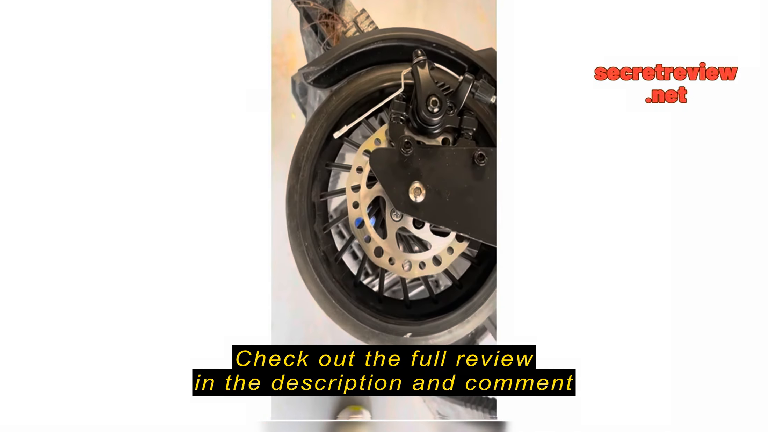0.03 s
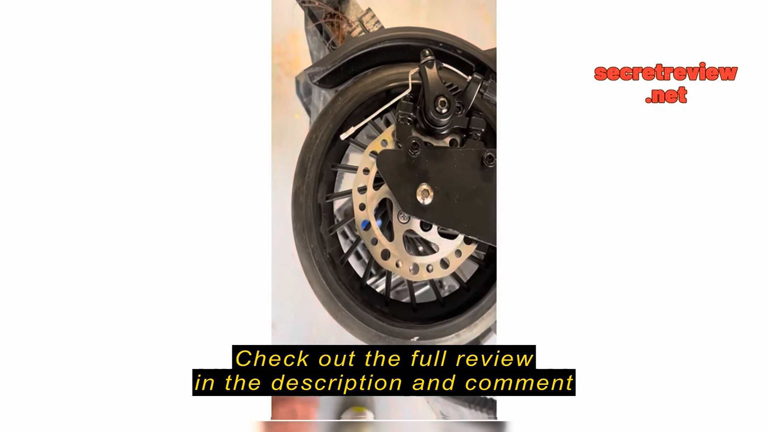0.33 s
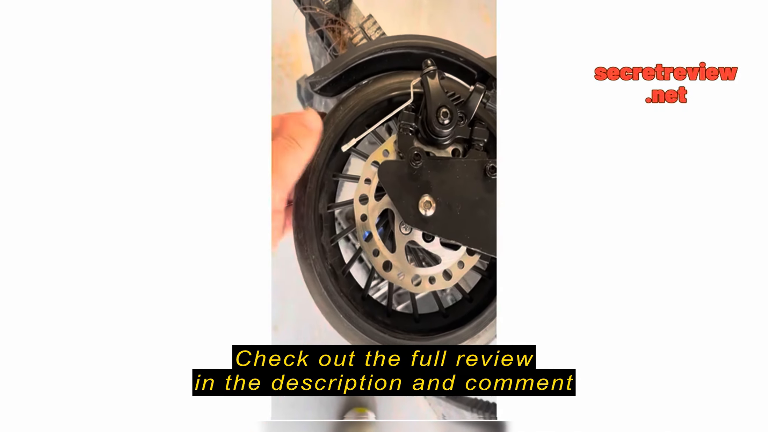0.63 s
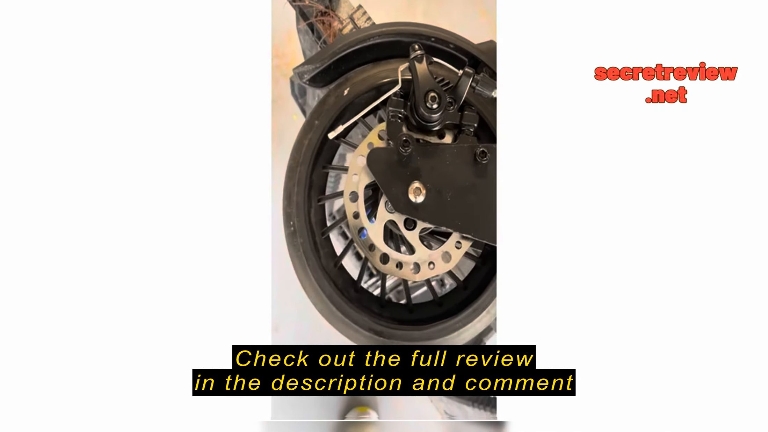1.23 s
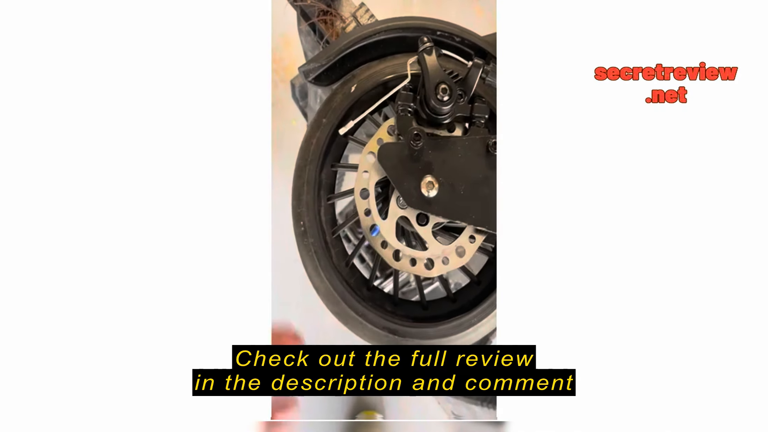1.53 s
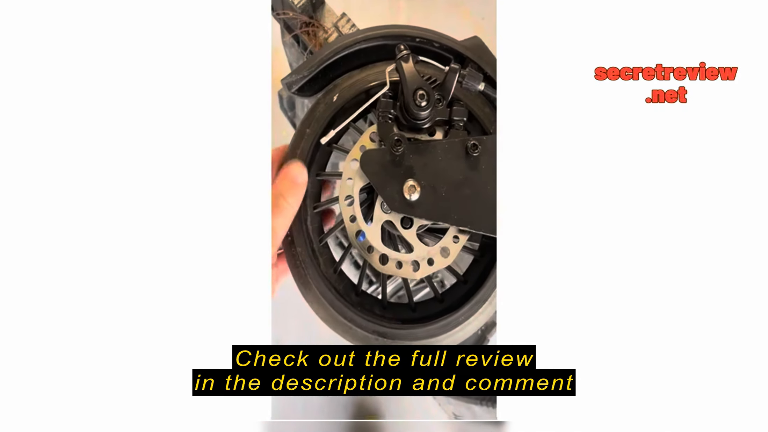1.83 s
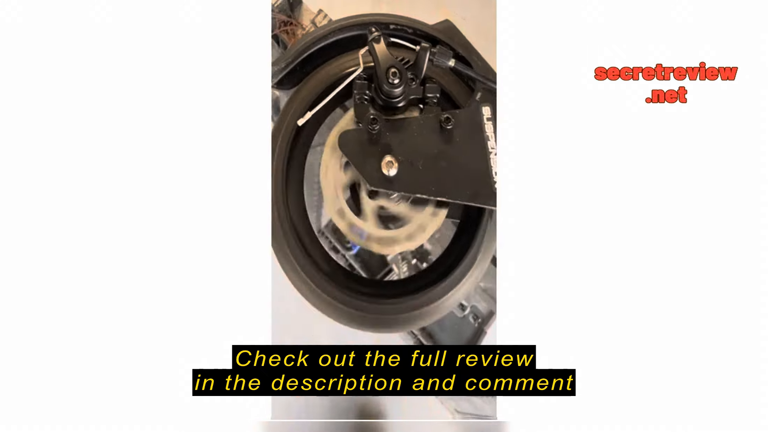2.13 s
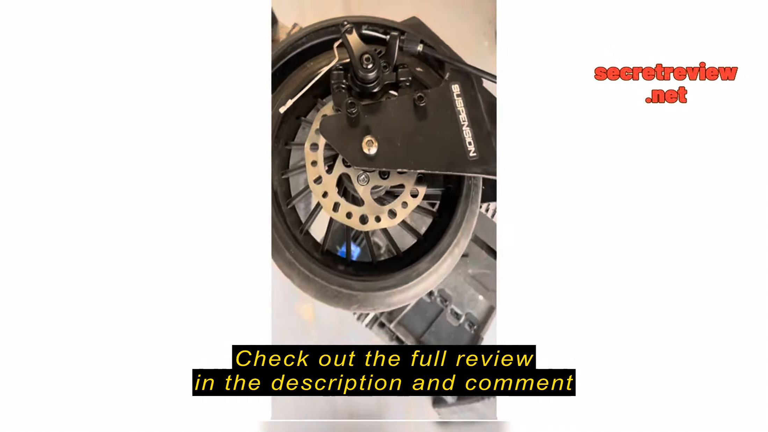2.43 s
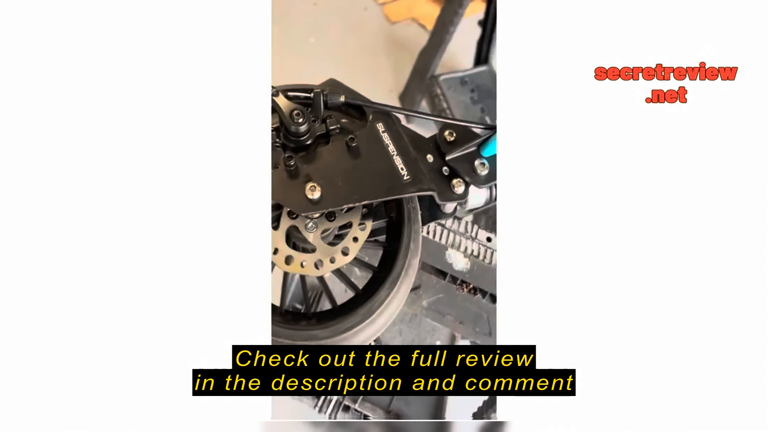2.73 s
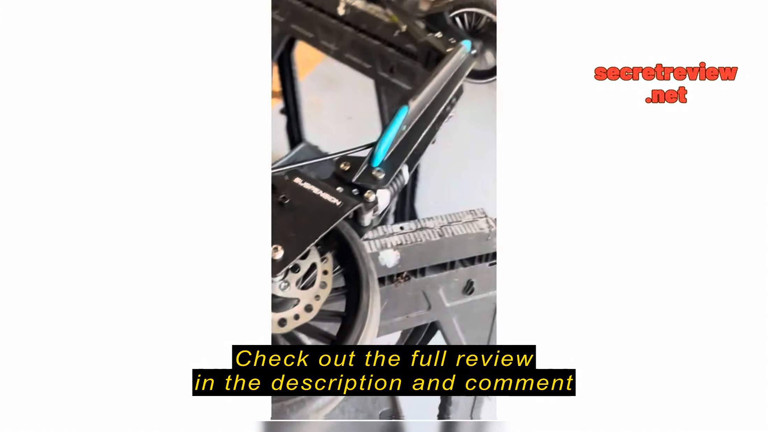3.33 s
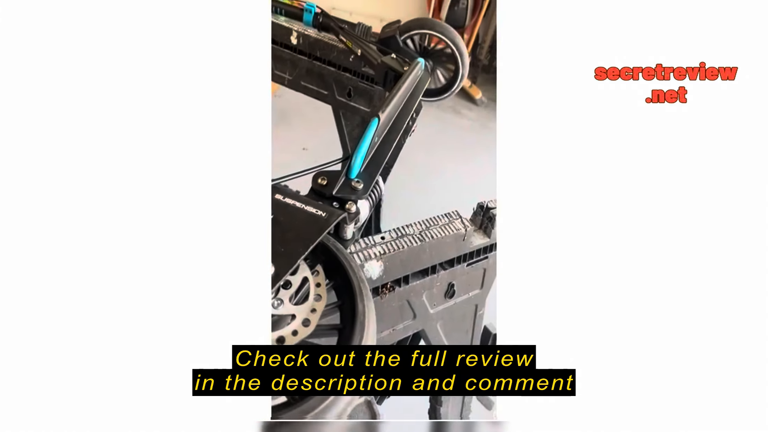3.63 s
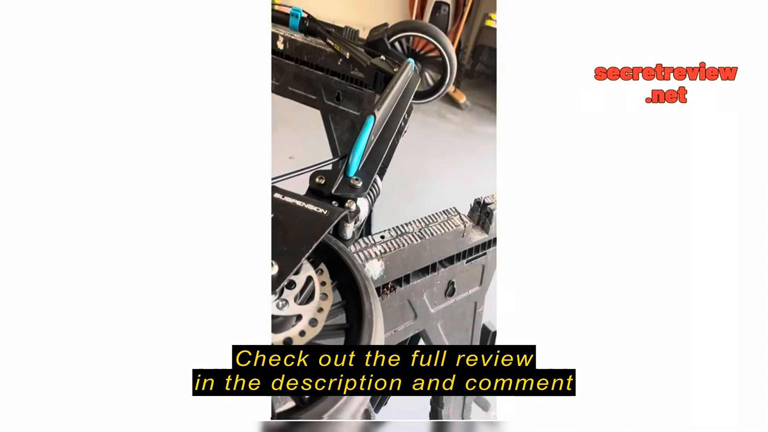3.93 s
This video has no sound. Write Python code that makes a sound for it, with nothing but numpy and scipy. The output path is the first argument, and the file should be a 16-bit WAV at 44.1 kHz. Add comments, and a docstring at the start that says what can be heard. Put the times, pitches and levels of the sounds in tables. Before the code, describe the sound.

Metallic ticking and rubbing from a hand-spun scooter wheel's brake disc in a quiet room.

```python
"""A small room with a low ventilation hum, where a scooter wheel is nudged and then spun by hand.
The hand swishes past the tyre with a thin squeak. The brake disc ticks and pings against its pads
and brushes them three times, each time harder: tiny friction slips ring the disc and caliper.
The last, gritty scrape ends in a knock of the fork, and the room rings briefly after every sound."""
import sys
import numpy as np
from scipy import signal
from scipy.fft import rfft, irfft, next_fast_len
from scipy.io import wavfile
from scipy.ndimage import uniform_filter1d

SR = 44100
rng = np.random.default_rng(int(sys.argv[2]) if len(sys.argv) > 2 else 0)


def unload_audio(sound):
    """Save the sound as a 16-bit wav file, at the path given as the first command line argument."""
    columns = np.transpose(np.atleast_2d(sound))
    # keep every value between -1 and 1, then stretch to whole-number steps
    steps = np.round(np.clip(columns, -1, 1) * 32767)
    wavfile.write(sys.argv[1], SR, steps.astype(np.int16))


N = 176400


def amp(db):
    """Decibels to gain."""
    return 10 ** (np.asarray(db) / 20)


def unit(x):
    """Scales to rms 1."""
    return x / np.sqrt(np.mean(x ** 2) + 1e-20)


def curve(points, hz):
    """Interpolates (f/Hz, value) points on a log-frequency axis."""
    f, value = np.transpose(points)
    return np.interp(np.log(hz + 1), np.log(f + 1), value)


def envelope(points):
    """Gain over time from (t/s, level/dB) points; silent outside them."""
    s, db = np.transpose(points)
    return amp(np.interp(np.arange(N) / SR, s, db, left=-200, right=-200))


def add(mix, s, sound):
    """Drops a sound into the mix at s seconds."""
    part = mix[max(round(s * SR), 0):][:len(sound)]
    part += sound[:len(part)]


def bins(size=4096):
    """Frequencies of a spectrum in Hz."""
    return np.fft.rfftfreq(size, 1 / SR)


def bell(hz, width_hz):
    """Bell shape of one resonance."""
    return 1 / (1 + (2 * (bins() - hz) / width_hz) ** 2)


def ring(colour_db):
    """A struck body: the minimum-phase impulse response of this colour, with energy 1."""
    log_gain = np.log(amp(np.r_[colour_db, colour_db[-2:0:-1]]))
    spectrum = np.exp(np.conj(signal.hilbert(log_gain)))
    response = np.fft.ifft(spectrum).real[:len(colour_db)]
    return response / np.linalg.norm(response)


def through(drive, colour_db):
    """Plays a drive through a body of this colour."""
    return signal.oaconvolve(drive, ring(colour_db))[:N]


def resonate(x, hz, width_hz):
    """A resonance of gain 1 at a steady or gliding pitch."""
    turn = np.exp(2j * np.pi * np.cumsum(np.broadcast_to(hz, len(x))) / SR)
    pole = np.exp(-np.pi * width_hz / SR)
    return 2 * (turn * signal.lfilter([1 - pole], [1, -pole], x / turn + 1e-18)).real


def narrow_band(x, hz, width_hz):
    """Two resonances in series draw a pitch out of noise, at rms 1."""
    return unit(resonate(resonate(x, hz, width_hz), hz, width_hz))


def stereo_pair(a, b, likeness):
    """Blends two independent spectra into left and right with a given correlation."""
    return np.array([a, likeness * a + np.sqrt(1 - likeness ** 2) * b])


def crunch(decay_s, rise_s):
    """A brief contact: rough noise that swells and dies away."""
    t = np.arange(4096) / SR
    shape = (1 - np.exp(-t / rise_s)) * np.exp(-t / decay_s)
    return shape / shape.max() * rng.choice([-1., 1.], len(t)) * rng.uniform(.5, 1.5, len(t))


def slip_train(per_s, size):
    """Stick and slip: randomly timed impulses of either sign."""
    return (rng.random(size) < per_s / SR) * rng.choice([-1., 1.], size)


def friction(spread_db, hiss, flutter_db):
    """Tiny slips of uneven size over a smooth hiss, under a fluttering pressure."""
    slips = slip_train(per_s=3500, size=N) * amp(spread_db * np.minimum(rng.exponential(1, N), 4))
    flutter = unit(uniform_filter1d(uniform_filter1d(rng.standard_normal(N), size=200), size=120))
    texture = unit(slips) + hiss * rng.standard_normal(N)
    return unit(texture * amp(flutter_db * flutter))


def ventilation_hum(rumble_db=-47.5, dip_below_hz=120):
    """Ventilation rumble with a few motor tones; the bass dips briefly."""
    # colour of the rumble: f/Hz, relative level/dB
    colour = [(15, -31), (33, -26), (45, -10), (56, 2.5), (70, -2), (90, 3), (113, 1), (135, -5),
              (200, -15), (290, -14), (350, -22.5), (520, -24.5), (750, -32), (1450, -37), (2100, -49),
              (5000, -60.5), (9000, -66.5), (16000, -105)]
    # motor tones: f/Hz, level/dB
    tones = [(57.3, -56.5), (181.8, -63), (227, -76), (318, -72), (363.6, -75), (408.8, -86), (454.3, -76)]
    # centred lows, wide highs: f/Hz, left-right correlation
    likeness = [(60, 1), (130, 1), (290, 0.95), (640, 0.17), (1400, 0.059), (4000, 0.043)]
    # dip in the bass: t/s, gain/dB
    dip = [(2.92, 0), (2.98, -5), (3.12, -3.5), (3.26, 0)]
    hz, t = bins(N), np.arange(N) / SR
    noise = stereo_pair(*rfft(rng.standard_normal((2, N))), curve(likeness, hz))
    rumble = unit(irfft(noise * amp(curve(colour, hz)), N))
    motor = sum(amp(db) * np.sqrt(2) * np.sin(2 * np.pi * (f * t + rng.random())) for f, db in tones)
    hum = amp(rumble_db) * rumble + motor
    bass = irfft(rfft(hum) / (1 + (hz / dip_below_hz) ** 4), N)
    return hum + bass * (amp(np.interp(t, *np.transpose(dip))) - 1)


def room(x, wet_db, early_db=-7.5, early_decay_s=0.0074, right_lag_s=4.7e-5):
    """Direct sound, early reflections off frame and floor, and a diffuse tail; the left side leads."""
    # reverb time: f/Hz, t60/s
    decay = [(200, 1), (600, 0.46), (1400, 0.55), (3500, 0.4), (7000, 0.39), (10000, 0.39), (16000, 0.38)]
    # stereo image of the tail: f/Hz, left-right correlation
    likeness = [(200, 1), (640, 0.5), (1400, 0.11), (3000, 0.031), (5000, 0.17), (7000, 0.39), (10000, 1),
                (16000, 1)]
    # lean to the left: f/Hz, left minus right/dB
    balance = [(300, -0.5), (1300, 1), (2400, 1.5), (3400, 2.5), (4500, 1.5), (7000, 0), (16000, 0)]
    hz, t, noise = signal.stft(rng.standard_normal((2, SR)), SR, nperseg=256)
    noise = stereo_pair(*noise, curve(likeness, hz)[:, None])
    t60 = curve(decay, hz)[:, None]
    fade_in = np.minimum(t / .006, 1)
    tail = signal.istft(noise * amp(-60 * t / t60) * fade_in, SR, nperseg=256)[1]
    early = rng.standard_normal(tail.shape) * np.exp(-np.arange(tail.shape[1]) / SR / early_decay_s)
    response = amp(wet_db) * tail / np.linalg.norm(tail[0])
    response += amp(early_db) * early / np.linalg.norm(early[0])
    response[:, 0] += 1  # direct sound
    stereo = signal.fftconvolve(x[None], response / np.linalg.norm(response[0]), axes=1)
    size = next_fast_len(stereo.shape[1])
    left = amp(curve(balance, bins(size)) / 2)
    right = np.exp(-2j * np.pi * bins(size) * right_lag_s) / left
    return irfft(rfft(stereo, size) * np.array([left, right]), size)[:, :N]


def hand_swish():
    """Skin slides on rubber: a soft, broad swish with a thin squeak in it."""
    # the hand's stroke past the tyre: t/s, level/dB
    stroke = [(1.22, -91), (1.33, -64), (1.41, -62.5), (1.47, -56), (1.5, -48), (1.53, -55), (1.58, -55.5),
              (1.65, -62), (1.7, -65), (1.75, -68), (1.78, -64)]
    # colour of the swish: f/Hz, relative level/dB
    colour = [(200, -6), (600, 5.5), (1800, 4), (3500, 8), (4200, 3.5), (5400, 8), (7000, 6), (9800, 3.5),
              (11000, -30), (16000, 4)]
    # wavering squeak: t/s, level/dB, f/Hz
    squeak_path = [(1.38, -89, 5370), (1.43, -71, 5660), (1.53, -64, 5490), (1.6, -72, 5650),
                   (1.68, -81, 5260), (1.74, -69.5, 5750), (1.77, -90, 5700)]
    slide = friction(spread_db=-2.0, hiss=0.9, flutter_db=2.5) * envelope(stroke)
    s, db, hz = np.transpose(squeak_path)
    pitch = np.interp(np.arange(N) / SR, s, hz)
    squeak = narrow_band(rng.standard_normal(N), pitch, width_hz=170)
    return through(slide, curve(colour, bins())) + squeak * envelope(np.transpose([s, db]))


def fork_knocks():
    """Play in the wheel's mounting gives dull knocks and scuffs."""
    # colour of the mounting: f/Hz, relative level/dB
    colour = [(40, -53), (120, 3.5), (300, -5.5), (700, 2.5), (1050, -2.5), (1400, 0), (2000, -18.5),
              (4000, -10.5), (16000, -32)]
    # knocks: t/s, level/dB, resonance f/Hz, resonance lift/dB, decay/s
    knocks = [(.953, -64.5, 2110, 35, 0.028), (1.312, -62, 1890, 34, 0.024),
              (1.772, -63.5, 1060, -11, 0.013), (3.19, -46, 1370, 26, 0.0029),
              (3.196, -41, 2250, 38.5, 0.0054), (3.778, -38, 930, 3.5, 0.0063),
              (3.824, -49.5, 570, 10, 0.0057)]
    out = np.zeros(N)
    for s, db, hz, lift_db, decay_s in knocks:
        body = curve(colour, bins()) + lift_db * bell(hz, width_hz=0.46 * hz)
        contact = crunch(decay_s, rise_s=0.64 * decay_s)
        add(out, s, amp(db) * signal.fftconvolve(contact, ring(body)))
    return out


def disc_body(colour, contact):
    """Gain curve in dB of disc and caliper: each kind of contact weights their resonances its own way."""
    # resonances: f/Hz, width/Hz, then lift/dB for a light rub, a firm rub, a hard rub and a tick
    modes = [(1623, 26, 2, -11, 6, -8), (2264, 510, -2, -13.5, 2, 7), (2500, 190, 6, 10, 4, 1),
             (2720, 130, 4, 9, 4, -1), (2870, 62, -0.5, 4, -1, -14.5), (3150, 51, 4.5, -13, -6, -5),
             (3497, 130, 7, 3, 4, 5.5), (3800, 250, 0.5, 14, 9.5, 5.5), (4510, 310, 3, 6, 5, 5.5),
             (5330, 830, 3.5, 1.5, 1.5, 3), (6300, 280, 4, 5, 1, 5), (6750, 670, -3, -14, 3.5, 4),
             (7300, 80, 1.5, -7, -8, 7.5), (7590, 400, -2, -6, -12, -2)]
    column = ["light", "firm", "hard", "tick"].index(contact)
    return curve(colour, bins()) + sum(lifts[column] * bell(hz, width) for hz, width, *lifts in modes)


def pad_ring(x, lift_db):
    """Adds the pad's own resonance, which sinks in pitch as the pad is pressed."""
    # glide of the resonance: t/s, f/Hz, gain/dB on top of lift_db
    glide = [(2.9, 2750, -9), (3.03, 2810, 8), (3.2, 2780, 0), (3.37, 2500, 2.5), (3.57, 2360, 7.5),
             (3.68, 2170, 1), (3.78, 2060, 7.5)]
    s, hz, db = np.transpose(glide)
    t = np.arange(N) / SR
    return x + amp(lift_db + np.interp(t, s, db)) * resonate(x, np.interp(t, s, hz), width_hz=340)


def disc_song():
    """In the light rub the disc's long modes sing in turn, each as its part of the rim passes the pad."""
    # swells: f/Hz, level/dB, centre t/s, half length/s
    swells = [(2530, -72, 1.95, .14), (2724, -70.5, 2.0, .19), (2902, -69, 2.12, .06),
              (3725, -68.5, 1.95, .14), (4530, -66.5, 1.96, .1), (4530, -71.5, 2.12, .06),
              (6480, -68, 2.05, .15), (1730, -72, 2.29, .06), (3390, -67.5, 2.28, .06),
              (3880, -68, 2.31, .04), (7110, -70, 2.31, .04)]
    t, out = np.arange(N) / SR, np.zeros(N)
    for hz, db, s, half_s in swells:
        mode = narrow_band(rng.standard_normal(N), hz, width_hz=48)
        out += amp(db) * mode * np.exp(-((t - s) / half_s) ** 4)
    return out


def pad_grabs(spread_db=1.5):
    """The pad grabs in gritty surges: clumps of coarse slips make it ring."""
    # surges: t/s, level/dB, f/Hz, length/s
    grabs = [(3.363, -44.5, 2460, 0.028), (3.416, -44.5, 2420, .028), (3.454, -51, 2280, 0.032),
             (3.512, -50, 2260, 0.018), (3.567, -46.5, 2380, 0.022), (3.633, -41.5, 2310, 0.019),
             (3.689, -43, 2420, 0.018), (3.714, -46, 2270, 0.028), (3.754, -52, 2150, 0.024)]
    t, out = np.arange(4096) / SR, np.zeros(N)
    for s, db, hz, length_s in grabs:
        slips = slip_train(per_s=720, size=len(t)) * amp(spread_db * rng.standard_normal(len(t)))
        surge = np.sin(np.pi * np.minimum(t / length_s, 1) ** .5)
        scrape = narrow_band(slips * surge, hz, width_hz=520)
        add(out, s, amp(db) * scrape * np.sqrt(length_s / t[-1]))
    return out


def brake_ticks():
    """Each time the disc catches a pad there is a short crunch, and the disc pings on."""
    # colour of a tick: f/Hz, relative level/dB
    colour = [(200, -45), (1000, -33.5), (1800, -30.5), (2500, 3.5), (5000, 2), (7000, 7), (9000, 6.5),
              (11000, -7), (16000, -6)]
    # catches: t/s, level/dB, treble tilt/(dB per octave), decay/s, relative ping level/dB
    catches = [(0.507, -56, -16.5, 0.0041, -5.5), (.741, -57, -1, 0.0021, -15),
               (.799, -50.5, -7.5, 0.0029, -12), (0.965, -61.5, -2, 0.0039, -22),
               (.9965, -45, 11.5, 0.0044, -21.5), (1.187, -52.5, -13, 0.0019, -35),
               (1.499, -43.5, -7, 0.002, -20), (1.809, -46, 3.5, 0.0017, -16), (2.408, -51, 0, 0.0024, -17),
               (2.42, -46, -4, 0.0027, -14), (2.469, -47, -5, 0.0023, -7.5),
               (2.544, -44.5, -6, 0.0015, -22), (2.59, -40.5, -2.5, 0.0012, -15.5),
               (3.028, -54.5, -13, 0.0025, -10), (3.056, -44.5, -6.5, 0.004, -19),
               (3.111, -37.5, -0.5, 0.0027, -13), (3.156, -43, -5.5, 0.019, -25),
               (3.198, -35, 3.5, 0.0026, -19), (3.254, -34.5, -0.5, 0.0013, -14),
               (3.302, -35, -1, 0.0012, -19), (3.337, -33.5, 3.5, 0.0021, -13.5),
               (3.366, -36, 1, 0.0051, -30), (3.402, -41, -2, 0.0018, -22), (3.426, -35, 1.5, 0.0028, -20),
               (3.46, -36.5, -2.5, 0.0016, -24), (3.516, -39.5, -0.5, 0.0045, -15),
               (3.571, -30, 2.5, 0.0014, -17.5), (3.602, -37, 2, 0.0016, -20),
               (3.636, -35.5, -1, 0.0021, -20), (3.692, -40, -9, 0.0036, -23),
               (3.725, -34.5, 11, 0.0039, -19), (3.763, -50, 0.5, 0.002, -29),
               (3.779, -30, -2, 0.0022, -26.5)]
    # partials of the ping: f/Hz, relative level/dB, t60/s
    partials = [(2525, 1.5, .17), (3120, -4.5, .2), (3720, -3, .09), (4540, -7, .16), (5120, -9, .14)]
    ticks, pings = np.zeros((2, N))
    body = disc_body(colour, "tick")
    octaves = np.log2(np.maximum(bins(), 2000) / 4000)
    t = np.arange(SR // 2) / SR
    ping = sum(amp(db - 60 * t / t60) * np.sin(2 * np.pi * hz * t) for hz, db, t60 in partials)
    for s, db, tilt, decay_s, ping_db in catches:
        contact = crunch(decay_s, rise_s=0.00065)
        add(ticks, s, amp(db) * signal.fftconvolve(contact, ring(body + tilt * octaves)))
        add(pings, s, amp(db + ping_db) * ping)
    return pad_ring(ticks, lift_db=-1.5) + pings


def brake_rub(holes_per_s=88):
    """The disc brushes the pads: lightly, chattering as its holes pass, then firmly, then hard."""
    # friction drive of the faint early grazing and the three rubs: t/s, level/dB
    idle_drive = [(0, -59.5), (.04, -89), (.15, -77), (.21, -69.5), (.25, -74), (.28, -99), (.8, -82),
                  (.82, -62.5), (.93, -80.5), (.97, -66), (1.04, -63.5), (1.07, -103), (1.18, -81),
                  (1.2, -65.5), (1.3, -66.5), (1.35, -67)]
    light_drive = [(1.808, -66), (1.815, -59.5), (1.92, -62), (2.03, -62.5), (2.14, -61), (2.19, -65),
                   (2.25, -58), (2.33, -59.5), (2.36, -80)]
    firm_drive = [(2.405, -72), (2.42, -55.5), (2.47, -55.5), (2.5, -58.5), (2.53, -54), (2.62, -55.5),
                  (2.645, -63), (2.7, -77)]
    hard_drive = [(2.93, -85), (2.98, -70), (3.01, -59), (3.05, -49.5), (3.1, -59), (3.14, -51.5),
                  (3.24, -53.5), (3.29, -60.5), (3.37, -48), (3.49, -53), (3.55, -47.5), (3.62, -46.5),
                  (3.68, -47), (3.77, -44), (3.8, -77), (3.83, -77)]
    # broad colour of each rub: f/Hz, relative level/dB
    light_colour = [(200, -5), (700, 8.5), (1600, 11.5), (3000, 14), (5000, 8), (8000, 11.5), (10400, -9.5),
                    (13000, -13.5), (16000, -11.5)]
    firm_colour = [(200, -0.5), (700, -5), (1500, -0.5), (2000, 16.5), (4200, -2.5), (5000, 5.5), (8500, 5),
                   (11000, -24), (16000, -7)]
    hard_colour = [(200, 1.5), (500, -1), (900, -4.5), (1800, 0.5), (3000, 0.5), (4200, -2), (6000, -0.5),
                   (9400, -2), (10400, -8), (12500, -20), (16000, -13)]
    hole_phase = np.arange(N) * holes_per_s / SR % 1
    chatter = unit(1 + unit(np.exp(-hole_phase / 0.19)))  # steady contact plus a pulse at each hole
    light_touch = envelope(idle_drive) + chatter * envelope(light_drive)
    light = friction(spread_db=3.5, hiss=0.94, flutter_db=-3.5) * light_touch
    firm = friction(spread_db=5.0, hiss=0.83, flutter_db=4.0) * envelope(firm_drive)
    hard = friction(spread_db=2.0, hiss=0.54, flutter_db=3.0) * envelope(hard_drive)
    return (through(light, disc_body(light_colour, "light"))
            + through(firm, disc_body(firm_colour, "firm"))
            + pad_ring(through(hard, disc_body(hard_colour, "hard")), lift_db=-6.0))


def scene():
    """Brake, fork and hand in the room, over the bed of hum."""
    scrapes = room(brake_rub() + pad_grabs() + disc_song(), wet_db=0.5)
    ticks = room(brake_ticks(), wet_db=0.5)
    knocks = room(fork_knocks(), wet_db=-5.0)
    swish = room(hand_swish(), wet_db=-3)
    return scrapes + ticks + knocks + swish + ventilation_hum()


def record(dry):
    """A steep low-pass trims the highest treble."""
    lowpass = signal.firwin(511, cutoff=15850, window=("kaiser", 9), fs=SR)
    return signal.oaconvolve(dry, lowpass[None], "same")


dry = scene()
out = record(dry)
unload_audio(out)
```